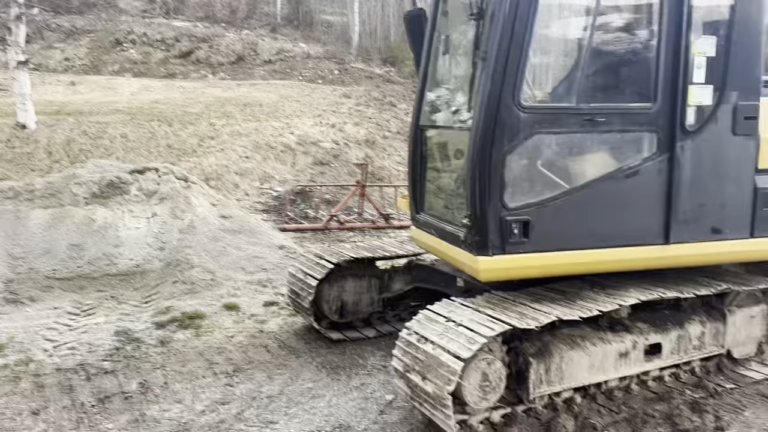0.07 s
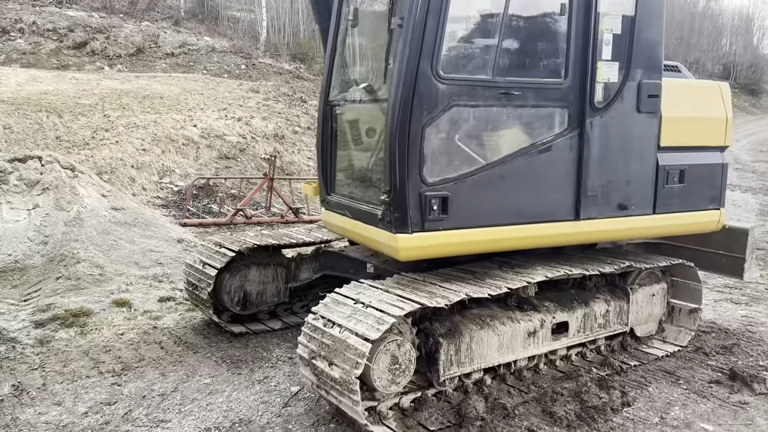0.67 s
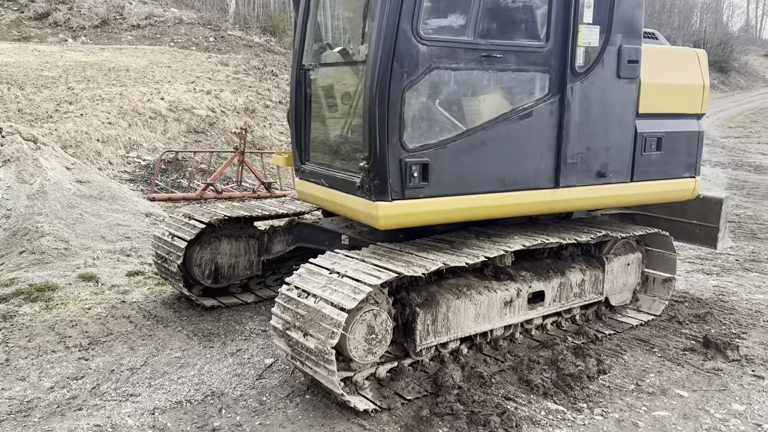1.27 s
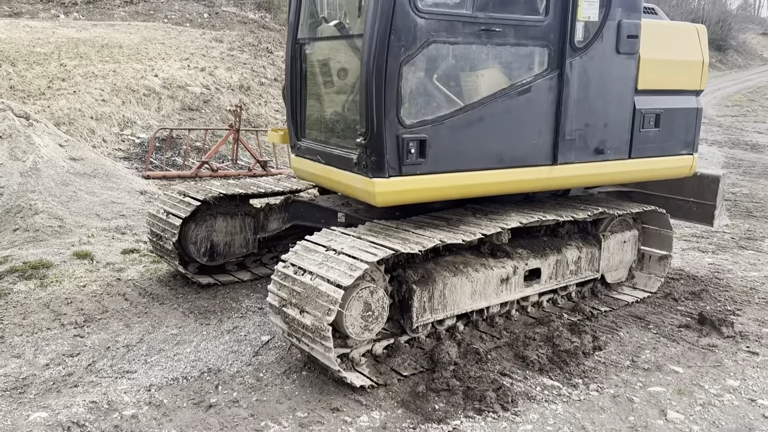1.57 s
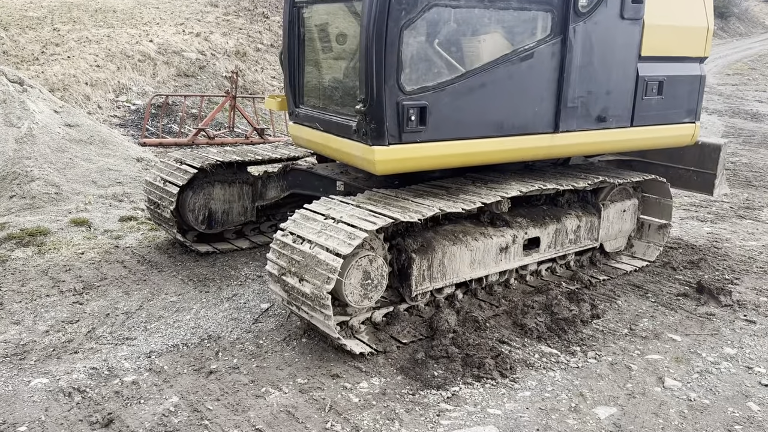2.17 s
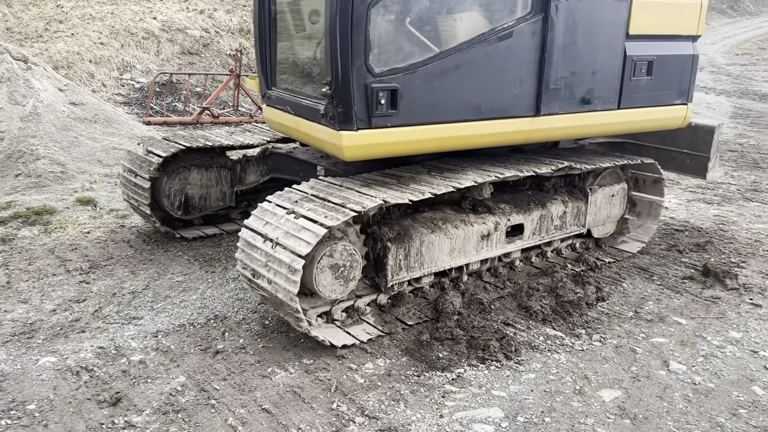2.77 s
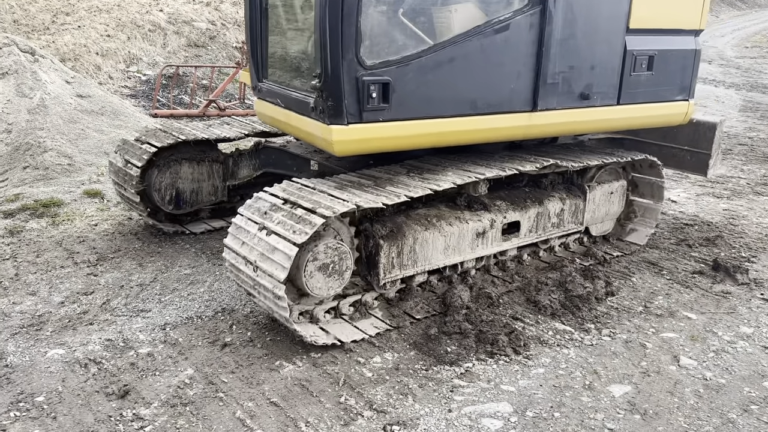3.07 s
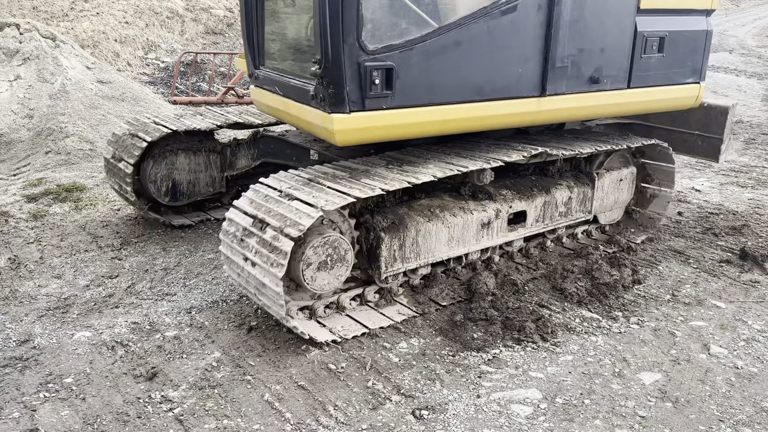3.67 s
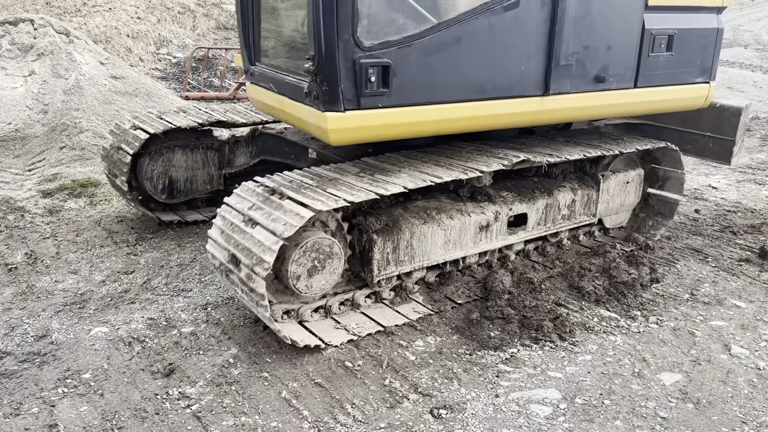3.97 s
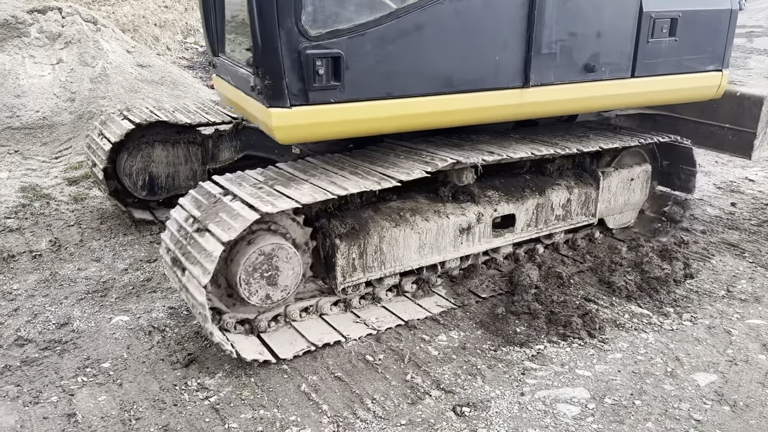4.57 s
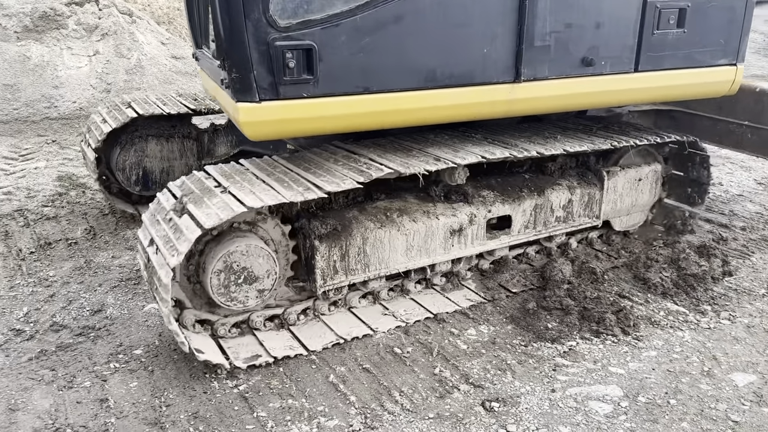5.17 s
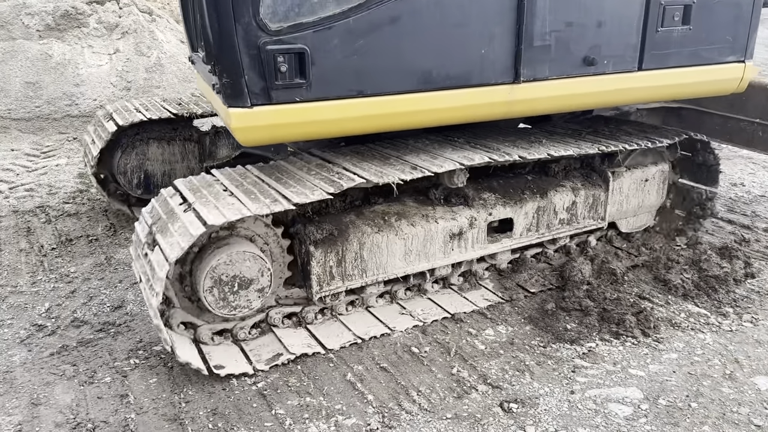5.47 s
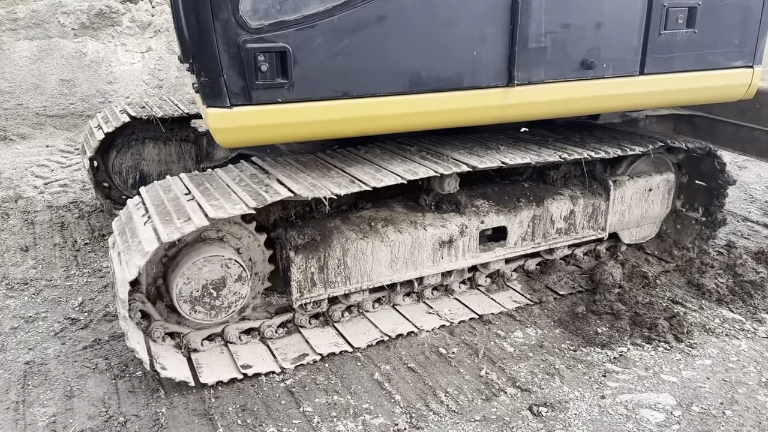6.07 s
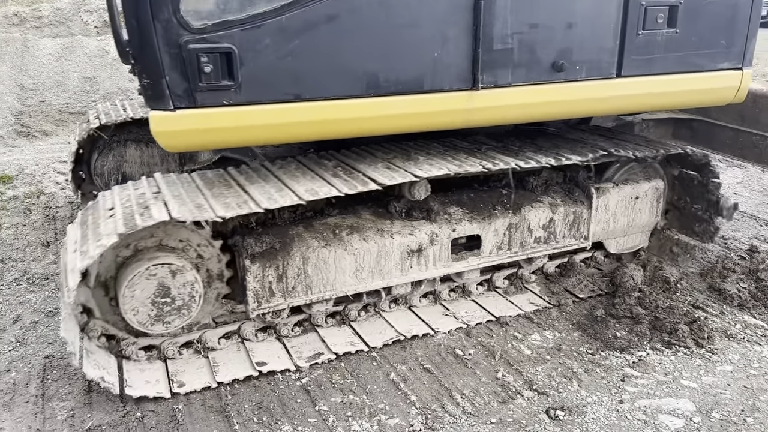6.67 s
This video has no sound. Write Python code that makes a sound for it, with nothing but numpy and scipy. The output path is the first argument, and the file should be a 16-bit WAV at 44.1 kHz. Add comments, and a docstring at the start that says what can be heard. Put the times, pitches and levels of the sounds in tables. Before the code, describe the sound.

A diesel excavator idles, then crawls past close by, its tracks clanking, cracking stones and scraping with a groan and screech.

```python
"""A small excavator's four-cylinder diesel drones and knocks, first idling, then crawling past close by.
Each firing puffs from the exhaust and knocks the engine block, while fan, pump and gears hum and whine.
Once the steel tracks move, rollers rumble, shoes (the track plates) clunk down and links snap tight.
Stones crunch and crack under them and pinched grit squeaks. Steel sticking and slipping on stone
groans, and near the end it screeches in three parts."""
import sys
import numpy as np
from scipy import signal
from scipy.fft import rfft, irfft
from scipy.io import wavfile
from scipy.ndimage import uniform_filter1d, map_coordinates

SR = 44100
rng = np.random.default_rng(int(sys.argv[2]) if len(sys.argv) > 2 else 0)


def generate_wav(sig):
    """Save sig (samples, or channels by samples) to the path in sys.argv[1] as 16-bit PCM at SR."""
    pcm = np.round(np.clip(np.atleast_2d(sig).T, -1, 1) * 32767).astype(np.int16)
    wavfile.write(sys.argv[1], SR, pcm)


N = 301203
TIME = np.arange(N) / SR
START_S = 2.15  # the tracks start to move
TOP_HZ = 15800  # upper edge of the treble

# how fast the engine runs: (time [s], firing rate [Hz])
FIRING_RATE = [(0, 52.81), (.8, 52.29), (1.15, 53.65), (1.4, 53.64), (1.7, 54), (2.1, 52.48), (2.42, 49.05),
               (2.65, 51.75), (2.87, 52.15), (3.15, 51.13), (3.4, 50.71), (3.65, 51.17), (3.9, 51),
               (4.65, 51.34), (4.9, 51.03), (5.6, 51.22), (6.0, 51.27), (6.83, 51.35)]
# how much the cab hides the engine bay: (time [s], shade [0-1])
CAB_SHADE = [(.6, 0.24), (1.1, 0.99), (2.1, 0.75), (4, 0), (6.83, 0.06)]


def amp(db):
    """Turns decibels into a gain."""
    return 10 ** (np.asarray(db) / 20)


def unit(x):
    """Scales a signal to an average strength (rms) of 1."""
    return x / np.sqrt(np.mean(x ** 2) + 1e-20)


def curve(rows, t=TIME):
    """Joins (time, value) points with straight lines."""
    return np.interp(t, *np.transpose(rows))


def shape(points, hz):
    """Gain of a (frequency, level) table at the given frequencies."""
    f, db = np.transpose(points)
    return amp(np.interp(np.log(hz + 1), np.log(f), db))


def colour(x, points):
    """Filters a sound by a (frequency, level) table."""
    return irfft(rfft(x) * shape(points, np.fft.rfftfreq(len(x), 1 / SR)), len(x))


def tap_response(gain):
    """How a body with this spectrum answers one tap: a sharp start, then a tail."""
    log_gain = np.log(np.maximum(np.r_[gain, gain[-2:0:-1]], 1e-5))
    return np.fft.ifft(np.exp(np.conj(signal.hilbert(log_gain)))).real


def resonances(rows, hz):
    """Summed gain of a body's resonances, the pitches at which it likes to ring."""
    return sum(amp(db) / np.hypot(1, 2 * (hz - f) / width) ** 1.35 for f, width, db in rows)


def ring(x, rows, floor_db):
    """Passes a sound through a body that rings at its resonances and is duller between them."""
    gain = amp(floor_db) + resonances(rows, np.fft.rfftfreq(4096, 1 / SR))
    return signal.fftconvolve(x, tap_response(gain)[:4096])[:len(x)]


def tilt(x, slope_db, pivot_hz):
    """Brightens or dulls a sound above a pivot by a moving slope in dB per octave."""
    hz, t, spectrum = signal.stft(x, SR, nperseg=512)
    slope = np.interp(t, np.arange(len(x)) / SR, slope_db)
    octaves = np.log2(np.maximum(hz / pivot_hz, 1))
    return signal.istft(spectrum * amp(octaves[:, None] * slope), SR)[1][:len(x)]


def wander(rate_hz, size=N):
    """A smooth random wobble of strength 1."""
    points = np.convolve(rng.standard_normal(4096), signal.windows.hann(9), "valid")
    place = np.arange(size) * 8 * rate_hz / SR  # eight points to a cycle
    return unit(np.interp(place, np.arange(len(points)), points))


def patchy(x, depth_db):
    """Lets patches of the spectrum swell and fade, as contacts come and go."""
    spectrum = signal.stft(x, nperseg=512)[2]
    patches = uniform_filter1d(rng.standard_normal(spectrum.shape), size=7, axis=0)
    patches = unit(uniform_filter1d(patches, size=8, axis=1))
    return unit(signal.istft(spectrum * amp(depth_db * patches))[1][:N])


def add(mix, start, sound):
    """Mixes a sound in at the given second."""
    part = mix[round(start * SR):][:len(sound)]
    part += sound[:len(part)]


def grains(per_s, spread_db, size=N):
    """Scattered clicks of uneven size."""
    height = amp(spread_db * np.minimum(rng.exponential(1, size), 4)) * rng.choice([-1, 1], size)
    return unit(height * (rng.random(size) < per_s / SR))


def burst(level_db, decay_s, body, snap, rise_s=0, rough=0.23):
    """A first snap and a quickly dying flurry of contacts, heard through a body's spectrum."""
    t = np.arange(SR // 4) / SR
    contacts = rng.standard_normal(len(t)) + rough * grains(per_s=1300, spread_db=-14, size=len(t))
    contacts[0] += snap
    fade = np.exp(-t / decay_s) * (1 - np.exp(-(t + 1 / SR) / (rise_s + 1e-9)))
    sound = signal.fftconvolve(contacts * fade, tap_response(body))
    return amp(level_db) * sound * np.linalg.norm(fade) / np.linalg.norm(sound)


def echoes(x, fade_s=0.19):
    """Short reflections from the ground and the hull."""
    t = np.arange(SR // 5) / SR
    tail = rng.standard_normal(len(t)) * amp(-60 * t / fade_s)
    return signal.fftconvolve(x, tail / np.linalg.norm(tail))[:N]


def approach_db(db_per_s=0.43):
    """The level rises as the moving machine comes nearer."""
    return db_per_s * np.maximum(TIME - START_S, 0)


def rolling(ramp_s=0.34):
    """Strength of the track noise: none at rest, then set by effort and nearness."""
    # how hard the tracks bear on the ground: (time [s], level [dB])
    effort = [(2.5, 3), (2.85, -1), (3.1, -0.5), (3.42, -2.5), (3.95, 1.9), (4.8, 2), (5.2, -1.5), (5.9, 2),
              (6.45, 0.5)]
    return np.clip((TIME - START_S) / ramp_s, 0, 1) * amp(curve(effort) + approach_db())


def squeak(length_s, db, first_hz, last_hz, jitter=0.022, flutter_db=3):
    """A pinched grain sings one thin, fluttering glide."""
    size = round(length_s * SR)
    hz = np.linspace(first_hz, last_hz, size) * (1 + jitter * wander(600, size))
    loudness = signal.windows.tukey(size, .5) * amp(db + flutter_db * wander(120, size))
    return np.sin(2 * np.pi * np.cumsum(hz) / SR) * loudness


def grit_squeaks(count=70, level_db=-62, spread_db=3, low_hz=2800, high_hz=8000, length_s=.025):
    """Grit caught between the shoes gives a few clear squeaks and many tiny ones."""
    # clear squeaks: (start [s], length [s], level [dB], first pitch [Hz], last pitch [Hz])
    clear_squeaks = [(4.569, .016, -52, 7650, 7730), (4.584, .055, -59, 6885, 7250),
                     (5.535, 0.054, -52, 7065, 7000), (5.588, 0.039, -50.5, 7040, 6900),
                     (5.618, 0.032, -51, 6600, 6290), (5.652, .016, -51, 7000, 7060),
                     (5.65, .04, -51, 6400, 5900), (5.714, .018, -44, 3170, 3280)]
    strength, out = rolling(), np.zeros(N)
    for start, *row in clear_squeaks:
        add(out, start, squeak(*row))
    for when, pitch, glide, size in rng.random((count, 4)):
        start = np.interp(when, [0, 1], [3.4, 6.5])
        hz = low_hz * (high_hz / low_hz) ** np.sqrt(pitch)
        db = level_db + spread_db * (2 * size - .5)
        tiny = squeak(length_s, db, hz, hz * (1 + 0.089 * (glide - .5)))
        add(out, start, strength[round(start * SR)] * tiny)
    return out


def rumble_and_crunch():
    """Rollers rumble along the chain while small stones grind under the shoes and ring the frame."""
    # tone colour of the rollers: (frequency [Hz], level [dB])
    rollers = [(60, -33), (130, 4.5), (200, -4), (320, 0.5), (450, 0), (650, -3), (1000, -7), (1600, -17),
               (4000, -57.5)]
    # tone colour of the gravel: (frequency [Hz], level [dB])
    gravel = [(300, -32.5), (800, 5), (1500, -5), (2000, -0.5), (2900, -5.5), (3800, -11), (5000, -15.5),
              (6800, -15.5), (8000, -25), (9200, -21.5), (11000, -34.5), (14500, -29)]
    # resonances of the track frame: (frequency [Hz], width [Hz], level [dB])
    frame = [(1440, 160, 4.5), (2180, 240, -4)]
    rumble = patchy(colour(grains(per_s=1500, spread_db=2), rollers), depth_db=1.5)
    grinding = colour(grains(per_s=3500, spread_db=2), gravel)
    crunch = patchy(ring(grinding, frame, floor_db=-4), depth_db=2)
    return rolling() * (rumble * amp(-32 + 1.1 * wander(25)) + crunch * amp(-41.5 + 1.8 * wander(30)))


def crack_spectrum(hz, slope_db):
    """Spectrum of a hard contact, made brighter or duller above 1000 Hz."""
    # tone colour of a cracking stone: (frequency [Hz], level [dB])
    stone = [(300, 1.5), (900, 14), (1800, 5.5), (2800, 1.5), (4500, -3), (7000, -10), (9500, -13),
             (11500, -25.5), (15000, -23.5)]
    return shape(stone, hz) * amp(slope_db * np.log2(np.maximum(hz / 1000, 1)))


def pebbles(count=30, level_db=-42, spread_db=6, decay_s=0.0035, bright_db=5):
    """Small stones crack at random under the moving tracks: extra rows for stones()."""
    rows = []
    for when, size, hardness in rng.random((count, 3)):
        start = np.interp(np.sqrt(when), [0, 1], [START_S, TIME[-1] - .5])
        rows.append((start, level_db + spread_db * (size - .5), decay_s, bright_db * hardness))
    return rows


def stones(crumble_above_s=.012, crack_rise_s=0.00005, crumble_rise_s=0.0036):
    """Under the machine's weight, stones that burst fast crack sharply; slower ones crumble softly."""
    # breaking stones: (time [s], level [dB], decay [s], brightness [dB per octave])
    breaks = [(2.73, -24.5, .006, -1.5), (3.222, -26, 0.036, -5.5), (3.612, -27, 0.0036, 0),
              (3.683, -28, .003, 0), (3.708, -27.5, 0.012, -3), (3.911, -27, 0.003, 1),
              (3.922, -25.5, 0.0035, -1), (4.071, -25, 0.014, -1.5), (4.163, -26, 0.012, -2),
              (4.315, -33.5, .0027, 6.5), (4.584, -27, 0.0093, -2), (4.608, -33.5, 0.012, 1),
              (4.821, -25.5, 0.019, -3), (4.836, -28, 0.0031, -0.5), (5.135, -24, .006, -3.5),
              (5.336, -21.5, 0.005, -12), (5.344, -27, 0.0033, 0.5), (5.374, -23.5, 0.0033, 2.5),
              (5.428, -29, 0.0046, 0), (5.523, -25, 0.025, -2), (5.536, -20, 0.0058, -5),
              (5.778, -37, 0.0047, 5), (6.206, -35.5, 0.0033, 6), (6.281, -29.5, 0.012, 0),
              (6.429, -37, .003, 7.5)]
    hz, out = np.fft.rfftfreq(4096, 1 / SR) + 1, np.zeros(N)
    for start, db, decay_s, slope_db in breaks + pebbles():
        rise_s = crumble_rise_s if decay_s > crumble_above_s else crack_rise_s
        body = crack_spectrum(hz, slope_db)
        add(out, start, burst(db, decay_s, body, snap=6.1, rise_s=rise_s, rough=0.93))
    return out


def link_snaps(floor_db=-1, decay_s=.002):
    """A slack track link is pulled tight: three quick steel contacts ring it briefly."""
    # links snapping tight: (time [s], level [dB], brightness [dB per octave])
    snaps = [(4.487, -15.5, 1.7), (5.171, -15, -2)]
    # a link touches, seats and rebounds: (delay [s], level [dB])
    seating = [(0, -3), (.0022, 2), (.0065, -6)]
    # resonances of a link: (frequency [Hz], width [Hz], level [dB])
    link = [(665, 60, 4), (1140, 66, 0), (1420, 110, 4), (1790, 50, 10), (2130, 64, 6), (3360, 110, -2),
            (3950, 60, 0), (4800, 60, -3)]
    hz, out = np.fft.rfftfreq(4096, 1 / SR) + 1, np.zeros(N)
    for start, db, slope_db in snaps:
        body = crack_spectrum(hz, slope_db) * (amp(floor_db) + resonances(link, hz))
        for delay, contact_db in seating:
            add(out, start + delay, burst(db + contact_db, decay_s, body, snap=8))
    return out


def shoe_clunks(mud_hz=3000, blow_octaves=.68, floor_db=-11, flurry_db=-0.5, ring_db=-5.5):
    """Shoes drop onto the ground: a gritty flurry of contacts and a short steel ring, dulled by mud."""
    # shoes landing: (time [s], level [dB], centre of the blow [Hz], decay [s])
    landings = [(2.468, -24.5, 219, 0.045), (2.66, -30, 185, 0.042), (2.705, -18.5, 635, 0.019),
                (3.045, -28, 1080, 0.022), (3.088, -25, 776, 0.027), (3.226, -21.5, 616, 0.028),
                (3.231, -25.5, 1580, 0.01), (3.25, -22.5, 926, 0.012), (3.607, -20, 354, 0.009),
                (4.414, -22.5, 560, 0.01), (4.818, -21.5, 710, 0.019), (5.119, -23.5, 960, 0.015),
                (5.52, -28.5, 1010, .027), (5.607, -22.5, 500, 0.008), (5.785, -23, 560, 0.021),
                (6.721, -25, 408, 0.014), (6.776, -19.5, 750, 0.017)]
    # resonances of a shoe: (frequency [Hz], width [Hz], level [dB])
    shoe = [(198, 71, 4.5), (555.5, 37, 13.5), (728, 160, 4.5), (914, 61, 2), (1080, 23, -5.5),
            (1332, 43, -0.5), (1516, 50, -1.5), (1627, 62, 5.5), (2040, 87, -11.5), (2630, 130, 6.5)]
    hz, out = np.fft.rfftfreq(4096, 1 / SR) + 1, np.zeros(N)
    t = np.arange(SR // 4) / SR
    for start, db, centre_hz, decay_s in landings:
        def blow(f):
            """How strongly this landing stirs each frequency."""
            return 1 / (1 + (f / mud_hz) ** 3) / (1 + (np.log2(f / centre_hz) / blow_octaves) ** 2)
        body = (amp(floor_db) + resonances(shoe, hz)) * blow(hz)
        flurry = burst(db, decay_s, body, snap=13, rough=1.5)
        ringing = np.zeros(len(t))
        for f, width, tone_db in shoe:
            fade = amp(tone_db) * blow(f) * np.exp(-np.pi * width * t / 2)
            ringing += fade * np.sin(2 * np.pi * f * t) * rng.choice([-1, 1])
        add(out, start, amp(flurry_db) * flurry)
        add(out, start, amp(ring_db) * ringing * np.linalg.norm(flurry) / np.linalg.norm(ringing))
    return out


def scrape(length_s, db, first_hz, last_hz, crest, crest_rough, slope_db,
           end_rough=0.75, swell_db=5, chatter_db=1.55, grip_s=0.0047, release_s=0.0054):
    """Steel sticks and slips, ringing the plate: loud and pure at its crest, raspier at both ends."""
    # tone colour of scraped steel: (frequency [Hz], level [dB])
    steel = [(400, -5.5), (700, 0), (950, -1), (1600, -4), (2200, -7.5), (3200, -5.5), (3700, -11),
             (4300, -13.5), (5000, -12), (6800, -8), (8000, -11.5), (9100, -9), (11000, -21.5),
             (15000, -29)]
    # resonances of the plate: (frequency [Hz], width [Hz], level [dB])
    plate = [(990, 130, 4), (1280, 58, -3), (1510, 90, -3.5), (1786, 81, 9), (2230, 80, 2), (2560, 74, 1),
             (2790, 110, 3), (3210, 110, 3.5), (3800, 100, 0), (4200, 77, 3.5), (5200, 80, 4),
             (5440, 65, 4.5), (6200, 50, 3), (6820, 100, 1.5)]
    t = np.arange(0, length_s, 1 / SR)
    off_crest = np.interp(t / length_s, [0, crest, 1], [1, 0, 1])
    rough = crest_rough + (end_rough - crest_rough) * off_crest
    stumble = 1 + .04 * crest_rough * wander(110, len(t))
    hz = first_hz * (last_hz / first_hz) ** (t / length_s) * stumble
    jitter = .1 * unit(uniform_filter1d(rng.standard_normal(len(t)), size=50))
    turns = np.cumsum(hz * (1 + (rough + .15) * jitter)) / SR
    slips = unit(sum(np.cos(2 * np.pi * k * turns) * (k * hz < TOP_HZ) / k ** 0.23
                     for k in range(1, 16)))
    rasp = 0.95 * grains(per_s=7000, spread_db=2.1, size=len(t))
    friction = colour((1 - rough) * slips + rough * rasp, steel)
    sound = tilt(ring(friction, plate, floor_db=-3.5), np.full(len(t), slope_db), pivot_hz=hz.min())
    sound /= np.sqrt(uniform_filter1d(sound ** 2, size=600) + 1e-12)  # even out the level
    grip = np.minimum(t / grip_s, 1) * np.minimum((length_s - t) / release_s, 1)
    return sound * grip * amp(db - swell_db * off_crest + chatter_db * wander(130, len(t)))


def shoe_scrapes():
    """Shoes grind over stone: slow slipping groans, fast slipping screeches."""
    # scrapes: (start [s], length [s], level [dB], first slip rate [Hz], last slip rate [Hz],
    # place of the crest [0-1], roughness there [0-1], brightness [dB per octave])
    scrapes = [(2.43, .11, -25.5, 382, 443.5, 0.6, .15, -18),
               (3.948, .53, -28.5, 470.6, 452.4, 0.9, 0.6, -30.5),
               (4.733, 0.056, -35.5, 2830, 3040, 0.5, 0.6, -3.5),
               (5.835, 0.021, -26.5, 2127, 2185, 0.3, 0.12, -2),
               (5.849, .022, -32, 3100, 2710, 0.3, 0.6, 1.5),
               (5.893, .068, -24.5, 1152, 1727, 0.7, 0.25, -0.2),
               (5.954, 0.038, -28, 2017, 2230, 0.2, 0.4, -1.5),
               (6.004, 0.088, -26, 949, 894.2, 0.5, 0.5, -1),
               (6.079, 0.047, -24.5, 1075, 962, 0.6, 0.5, -2),
               (6.108, 0.042, -21.5, 928, 980, 0.6, 0.6, -5)]
    out = np.zeros(N)
    for start, *row in scrapes:
        add(out, start, scrape(*row))
    return out


def engine_clatter(firings, level_db=-27, repeat_share=0.24, decay_firings=0.35):
    """Each firing knocks the block; part of the noise repeats every four firings, part is always new."""
    # knock of each of the four cylinders: (level [dB])
    cylinders_db = [-5, -5, -9.5, -5]
    # tone colour of the engine block: (frequency [Hz], level [dB])
    block = [(30, -9.5), (80, 5.5), (180, 0), (380, -1.5), (520, -3.5), (660, -9.5), (1000, -13.5),
             (1550, -16.5), (1900, -19.5), (3000, -25), (4200, -33.5), (7000, -39.5), (9500, -47),
             (11500, -54), (15500, -52)]
    cycle = irfft(np.exp(2j * np.pi * rng.random(1700)))  # noise for one round of four firings
    place = firings / 4 % 1 * len(cycle)
    repeated = unit(map_coordinates(cycle, [place], order=3, mode="grid-wrap"))
    noise = np.sqrt(repeat_share) * repeated + np.sqrt(1 - repeat_share) * rng.standard_normal(N)
    cylinder = amp(cylinders_db)[firings.astype(int) % 4]
    knock = 1 + cylinder * np.exp(-(firings % 1) / decay_firings)
    shaded = tilt(colour(noise * knock, block), slope_db=-0.77 * curve(CAB_SHADE), pivot_hz=500)
    return amp(level_db + approach_db()) * unit(shaded)


def engine_drone(firings, idle_hz=53.6, fuel_db_per_hz=0.35, fuel_lag_s=0.47, loaded_s=5.4,
                 throb_db=0.56, waver_db=2, flutter_db=1.8):
    """The low exhaust tones crest together in one puff a firing; fan and gear tones run free of it."""
    # hum of pipe, fan and block: (pitch [x firing rate], idle level [dB], loaded level [dB],
    # change once the engine bay is close [dB])
    hum_tones = [(1.58, -36, -34.5, 1), (1.75, -37.5, -36, 0.5), (2.105, -34.5, -30, -2),
                 (2.75, -38, -43.5, -0.5), (3, -46.5, -35.5, 0), (3.68, -37.5, -34.5, 4.5),
                 (4, -42, -39, -0.5), (5, -40.5, -42.5, 11.5), (8.5, -48.5, -46.5, 7.5),
                 (9, -41.5, -35.5, -8.5), (10, -47, -46.5, -4.5), (11, -48, -46.5, -1.5),
                 (13.25, -50, -60.5, 1), (15, -49, -48.5, 7), (16.75, -49.5, -45.5, 0),
                 (17.75, -54.5, -57, 2)]
    # whine of pump and timing gears: (pitch [x firing rate], idle level [dB], loaded level [dB])
    whine_tones = [(17.9, -7, -14), (20.91, 1, -9.5), (22.76, -6, -9.5), (25.32, -6, -10),
                   (27.9, -2.5, -5.5), (29.16, -6, -6), (30.35, -10.5, -6), (34.9, -11.5, -27),
                   (42.4, -7, -24), (54, -15, -22)]
    # a panel rings when a tone nears its pitch: (frequency [Hz], width [Hz], level [dB])
    panel = [(521.2, 10.7, 7.5)]
    rate_hz = curve(FIRING_RATE)
    # when the speed sags below idle, the engine gets more fuel a moment later
    fuel_db = fuel_db_per_hz * np.maximum(idle_hz - curve(FIRING_RATE, TIME - fuel_lag_s), 0)
    fade_db = 1.5 * np.maximum(TIME - loaded_s, 0)
    base_db = -18 + fuel_db + approach_db() + .5 * throb_db * wander(14)
    octave_db = -18.5 + 0.35 * fuel_db - fade_db + throb_db * wander(10)
    angle = 2 * np.pi * firings - np.pi / 2  # the puff leaves the pipe a quarter beat after the knock
    skew = 0.59  # radians: a puff rises faster than it falls
    out = np.cos(angle) * amp(base_db) + np.cos(2 * angle + skew) * amp(octave_db)
    load = np.interp(TIME, [START_S, loaded_s], [0, 1])
    bay_near = np.interp(TIME, [4.18, 5.18], [0, 1])

    def tone(multiple, idle_db, loaded_db):
        """One wavering tone that follows the engine's speed and load."""
        level_db = idle_db + load * (loaded_db - idle_db) + waver_db * wander(5)
        runs_free = multiple not in (3, 4, 5)  # these three belong to the puff
        drift = (0.24 + 0.012 * multiple) * wander(7) + 2 * np.pi * rng.random() * runs_free
        panel_gain = 1 + resonances(panel, multiple * rate_hz)
        return panel_gain * amp(level_db) * np.cos(multiple * angle + skew * (multiple - 1) + drift)

    for *row, change_db in hum_tones:
        out += tone(*row) * amp(change_db * bay_near)
    whine_db = -43 - 10 * curve(CAB_SHADE)
    for row in whine_tones:
        out += tone(*row) * amp(whine_db + flutter_db * wander(22))
    return np.sqrt(2) * out


def stereo(front, flank, left_db=0.97):
    """Sound from ahead reaches left and right a little apart; sound from the flanks adds width."""
    # stereo width: (frequency [Hz], left minus right against their sum [dB])
    width = [(60, -22), (150, -19.5), (380, -16.5), (700, -11), (1290, -3), (2300, -8), (4400, -1.5),
             (6200, -6), (8200, 9.5), (9500, -2), (10800, -30), (15000, -1)]
    front_share = .62
    shifted_front = signal.hilbert(front).imag  # every tone moved by a quarter cycle
    side = colour(np.sqrt(1 - front_share ** 2) * flank - front_share * shifted_front, width)
    return np.array([(front + side) * amp(left_db / 2), (front - side) * amp(-left_db / 2)])


def scene(echo_db=-11):
    """Engine and tracks together. The machine is wide: far panels and second track sound on their own."""
    rate_hz = curve(FIRING_RATE) * (1 + 0.001993 * wander(8))
    firings = np.cumsum(rate_hz) / SR  # number of firings so far
    contacts = shoe_clunks() + link_snaps() + stones() + grit_squeaks() + shoe_scrapes()
    engine = engine_drone(firings) + engine_clatter(firings)
    front = engine + rumble_and_crunch() + contacts + amp(echo_db) * echoes(contacts)
    flank = engine_clatter(firings) + rumble_and_crunch() + echoes(contacts)
    return stereo(front, flank)


def record(dry):
    """Cuts away the highest treble."""
    low_pass = signal.firwin(511, TOP_HZ, window=("kaiser", 9), fs=SR)
    return signal.oaconvolve(dry, low_pass[None], "same")


dry = scene()
out = record(dry)
generate_wav(out)
```